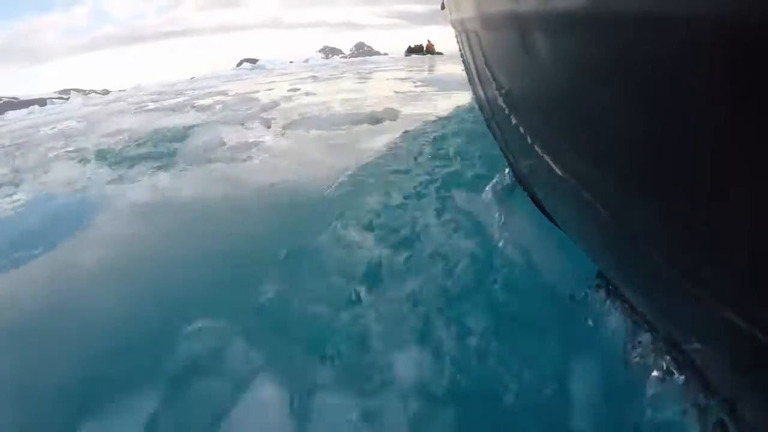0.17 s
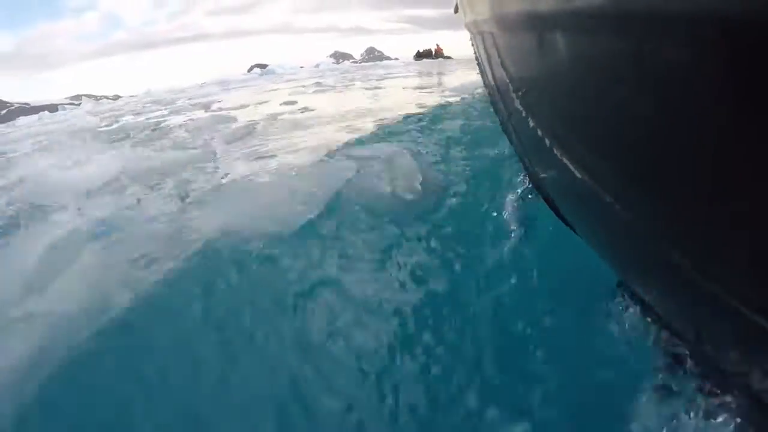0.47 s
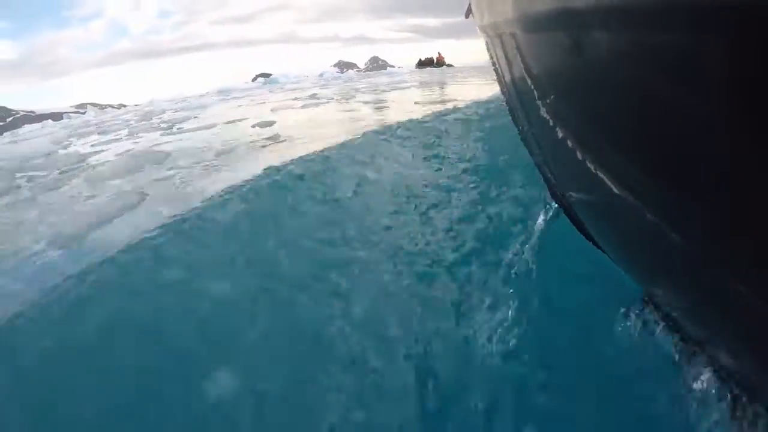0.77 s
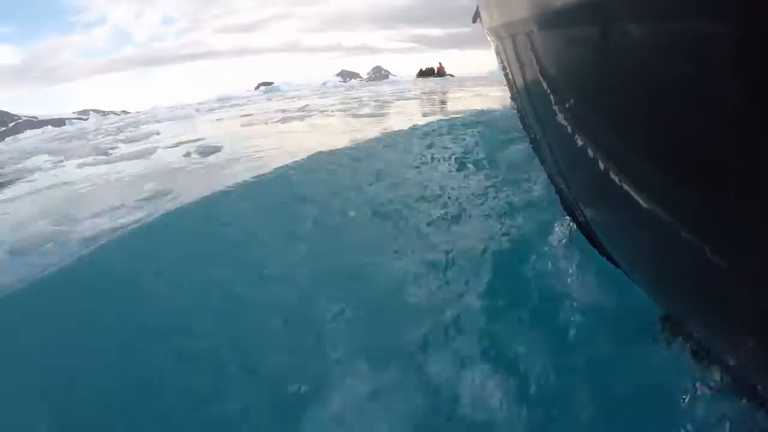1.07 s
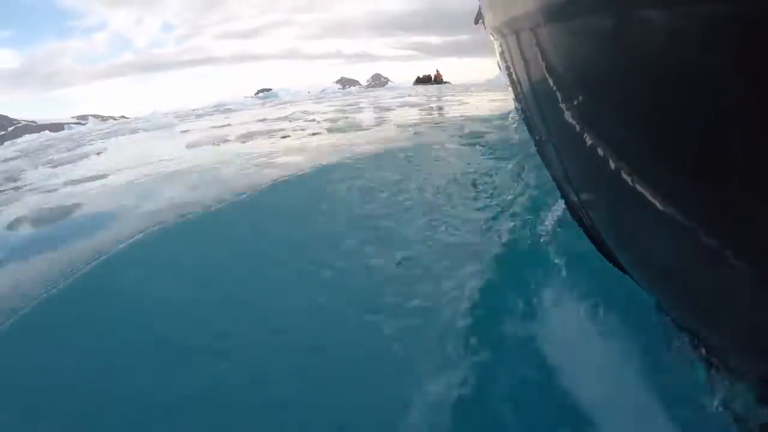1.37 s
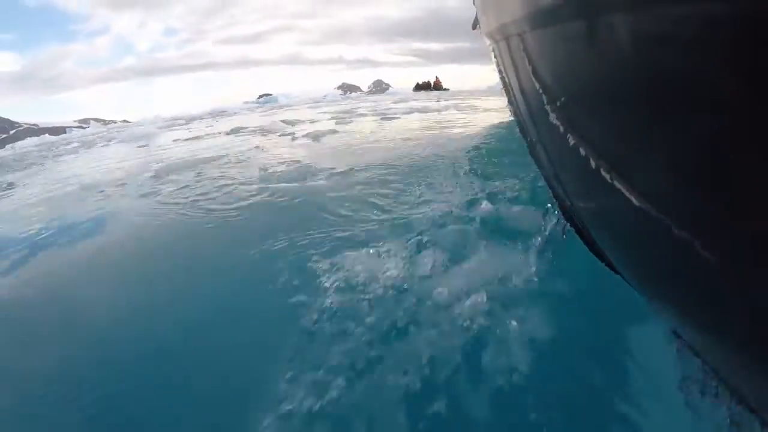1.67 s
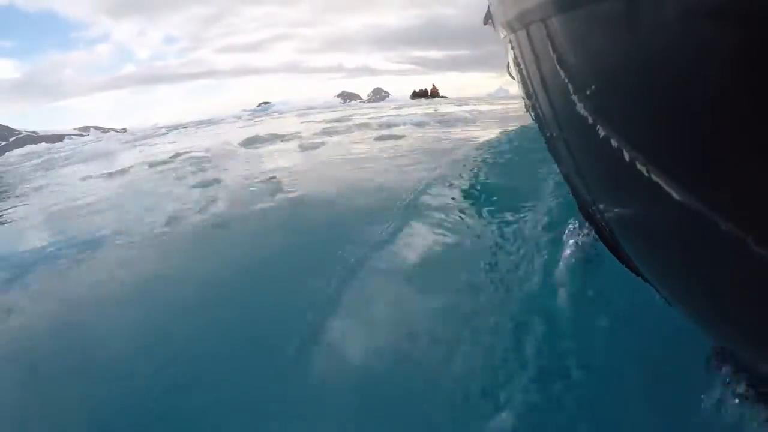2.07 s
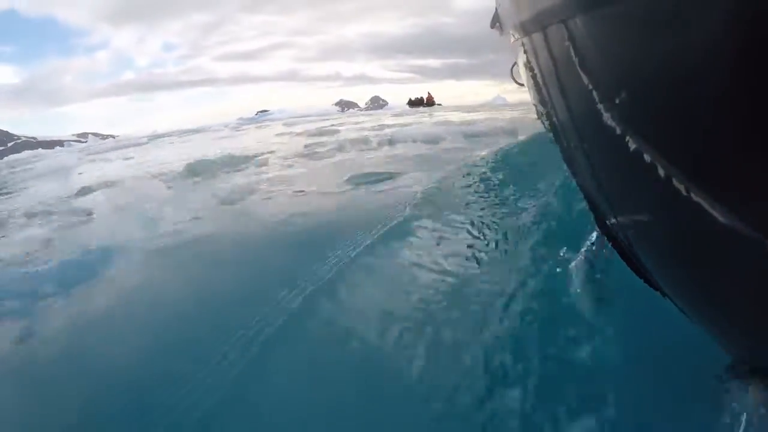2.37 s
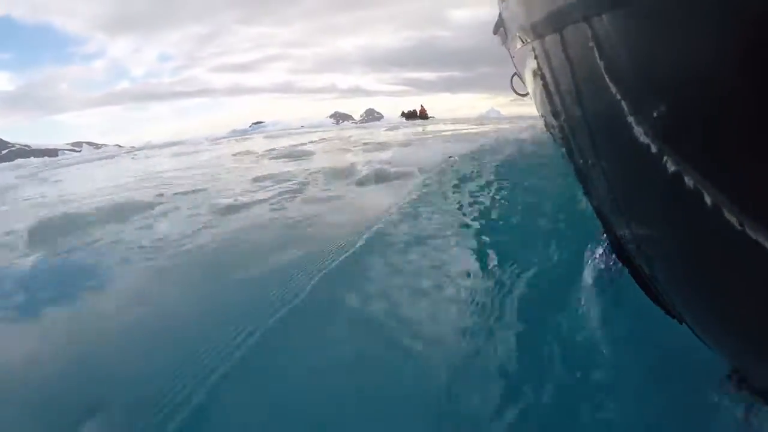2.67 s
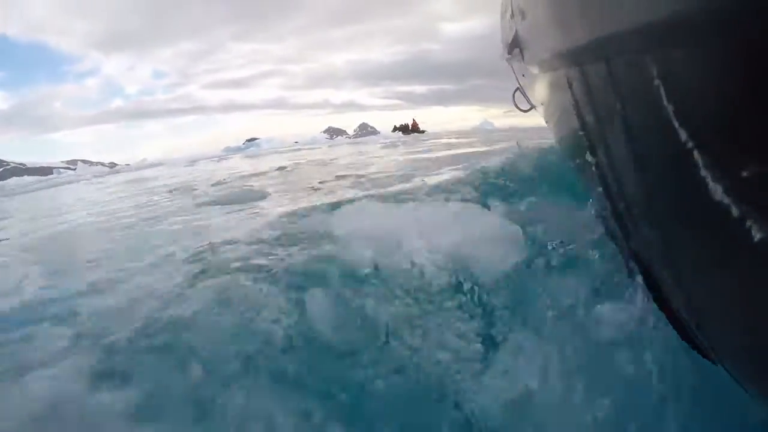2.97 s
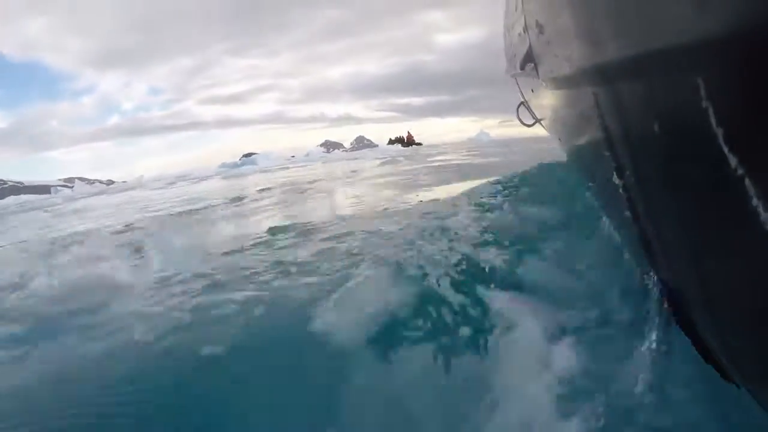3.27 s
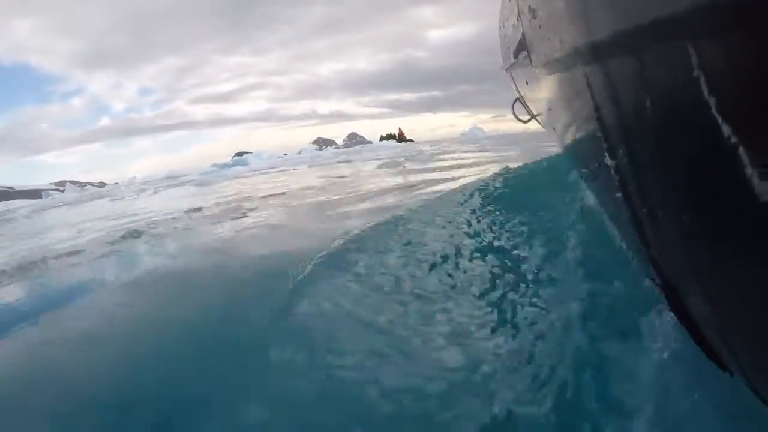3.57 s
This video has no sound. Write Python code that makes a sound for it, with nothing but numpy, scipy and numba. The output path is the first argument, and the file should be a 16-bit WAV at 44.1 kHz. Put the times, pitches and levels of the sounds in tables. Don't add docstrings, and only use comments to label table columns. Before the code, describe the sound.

Water gurgles and bubbles along a moving boat hull, with low rumble and faint icy clicks

```python
import sys
import numpy as np
from scipy import signal
from scipy.fft import rfft, irfft, next_fast_len
from scipy.io import wavfile
from numba import njit

SR = 44100
rng = np.random.default_rng(int(sys.argv[2]) if len(sys.argv) > 2 else 0)


def dump(signal):
    limited = np.clip(np.atleast_2d(signal).T, -1, 1)
    pcm = np.round(limited * 32767).astype(np.int16)
    wavfile.write(sys.argv[1], SR, pcm)


def voltage_ratio(decibels):
    exponent = np.asarray(decibels, float) / 20
    return 10 ** exponent


N = 164493


def level_db(rows):
    t_s, db = np.transpose(rows)
    return np.interp(np.arange(N) / SR, t_s, db)


def rms_one(x):
    return x / np.sqrt(np.mean(x ** 2) + 1e-20)


def colour(x, points):
    f_hz, db = np.transpose(points)
    size = next_fast_len(N)
    log_f = np.log(np.arange(1, size // 2 + 2) * SR / size)
    gain = voltage_ratio(np.interp(log_f, np.log(f_hz), db, -120, -120))
    return rms_one(irfft(rfft(x, size) * gain, size)[:N])


def drift(rate_hz):
    hop, settle = 40, 2000
    pole = np.exp(-2 * np.pi * rate_hz * hop / SR)
    white = rng.standard_normal(N // hop + 2 + settle)
    slow = signal.lfilter([1], [1, -2 * pole, pole * pole], white)[settle:]
    return np.interp(np.arange(N) / hop, np.arange(len(slow)), rms_one(slow))


@njit
def add_bubbles(out, start, gain, f_hz, cycles, rise, swell, sr):
    for k in range(len(start)):
        tau = cycles[k] / f_hz[k] * sr
        phase, step = 0., 2 * np.pi * f_hz[k] / sr
        for i in range(min(int(tau * (6 + swell)), len(out) - start[k])):
            u = i / tau
            phase += min(step * (1 + rise[k] * u), 3.)
            envelope = (1 - np.exp(-u / swell)) ** 2 * np.exp(-u)
            out[start[k] + i] += gain[k] * np.sin(phase) * envelope


def froth(count, low_hz, high_hz, cycles, rise, spread_db, clump_db):
    when, size, loud, ring, climb = rng.random((count, 5)).T
    busy = np.cumsum(voltage_ratio(clump_db))
    start = np.searchsorted(busy / busy[-1], when)
    f_hz = low_hz * (high_hz / low_hz) ** size
    gain = f_hz * voltage_ratio(spread_db * np.minimum(-np.log(loud), 3.2))
    ringing = cycles * (0.27 + 1.64 * ring ** 2)
    out = np.zeros(N)
    add_bubbles(out, start, gain, f_hz, ringing, rise * 3 * climb ** 3, 0.3, SR)
    return rms_one(out)


def wash(patchy_db, rate_hz):
    out, together = 0, drift(rate_hz)
    edges_hz = 15 * 2 ** np.arange(0, 10.1, 0.5)
    white = rng.standard_normal((2, N))
    for k, band_hz in enumerate(zip(edges_hz, edges_hz[1:])):
        sos = signal.butter(2, band_hz, "band", fs=SR, output="sos")
        band = signal.sosfilt(sos, white[k % 2])
        out = out + band * voltage_ratio(patchy_db * (0.18 * together + drift(rate_hz)))
    return rms_one(out)


def lone(rows, cycles, rise, swell, trim_db):
    t_s, db, f_hz = np.transpose(rows)
    ringing = cycles * (f_hz / f_hz.mean()) ** 1.1
    out = np.zeros(N)
    add_bubbles(out, (t_s * SR).astype(np.int64), voltage_ratio(db + trim_db), f_hz, ringing, rise + 0 * t_s, swell, SR)
    return out


# [t/s, level/dB]
WAVE_LEVEL = [(0.0, -27), (0.36, -28), (0.58, -31.5), (0.83, -29.5), (1.17, -28.5), (1.5, -29), (1.67, -22),
              (1.82, -31.5), (1.95, -27), (2.14, -28.5), (2.68, -30), (3.02, -26.5), (3.32, -28.5),
              (3.61, -26.5), (3.73, -22.5)]
# [f/Hz, density/dB]
WAVE_COLOUR = [(100, 3), (170, 2.5), (300, -2.5), (520, -11), (720, -11), (1300, -16), (1800, -24),
               (3000, -39)]


def bow_wave(churn, rise_db):
    clump_db = 2.5 * churn + 1.5 * drift(25.01)
    crowd = froth(count=5000, low_hz=109.07, high_hz=2797, cycles=3.24, rise=0.0827,
                  spread_db=4.0, clump_db=clump_db)
    bed = voltage_ratio(-5.0 + 0.6 * churn) * wash(patchy_db=1.0, rate_hz=6.8)
    return voltage_ratio(level_db(WAVE_LEVEL) + 3.5 + rise_db) * colour(crowd + bed, WAVE_COLOUR)


# [t/s, level/dB]
SPRAY_LEVEL = [(0.0, -43), (0.36, -41), (0.92, -43.5), (1.07, -42.5), (1.78, -42), (1.9, -44.5),
               (2.25, -45), (3.2, -39.5), (3.73, -41)]
# [f/Hz, density/dB]
SPRAY_COLOUR = [(900, 7), (1700, 9), (2500, -3.5), (4400, -5), (5150, -17), (7000, -17), (9000, -20),
                (14800, -50.5)]


def spray(churn, rise_db):
    clump_db = 2.2 * churn + 2.5 * drift(90.0)
    crowd = froth(count=20000, low_hz=891.0, high_hz=11220, cycles=4.8, rise=0.023,
                  spread_db=5.0, clump_db=clump_db)
    bed = voltage_ratio(-1.6 + 1.1 * churn) * wash(patchy_db=0.8, rate_hz=16.0)
    return voltage_ratio(level_db(SPRAY_LEVEL) + 6.0 + rise_db) * colour(crowd + bed, SPRAY_COLOUR)


# [centre t/s, half-length/s, bow wave rise/dB, spray rise/dB]
SPLASHES = [(0.033, 0.0056, 2.5, 1.5), (0.355, 0.049, 7, 1.5), (0.579, 0.0096, 7.5, 1.5),
            (0.747, 0.0053, -3, 8.5), (1.054, 0.0089, 9, -2), (1.556, 0.016, 1.5, 5.5),
            (1.645, 0.0048, 6.5, -8), (1.71, 0.01, 2.5, 5.5), (1.794, 0.055, 11, -1), (1.909, 0.01, 6, 6),
            (2.596, 0.0034, -13, -2), (0.505, 0.038, 6, -1.5), (3.274, 0.029, -1, -3),
            (3.017, 0.023, 4, 3.5), (3.431, 0.026, 6, 3.5), (3.505, 0.036, 7, 1.5)]


def splashes():
    t_s, half_s, *rise_db = np.transpose(SPLASHES)
    away = (np.arange(N) / SR - t_s[:, None]) / half_s[:, None]
    return np.array(rise_db) @ np.exp(-away ** 2)


# [t/s, peak level/dB, f/Hz]
GULPS = [(0.075, -9, 135), (0.155, -6, 130), (0.33, -17, 258), (0.692, -9, 148), (1.036, -7, 184),
         (1.092, -11, 205), (1.326, -7.5, 165), (1.437, -12.5, 155), (1.646, -16, 270), (1.791, -0.5, 167),
         (2.005, -3, 231), (2.63, -2, 140), (2.739, -10, 179), (2.831, -1, 155), (2.879, -5, 191.6),
         (2.968, -4.5, 285), (3.033, -8, 212), (3.118, -6.5, 169.2), (3.188, -7, 198), (3.421, -11.5, 362),
         (3.509, -1.5, 152.5), (3.662, -6, 238)]


def gulps():
    return lone(GULPS, cycles=0.8, rise=0.072, swell=0.48, trim_db=5.5)


# [t/s, peak level/dB, f/Hz]
PLOPS = [(0.277, -15.5, 890), (0.338, -12, 524), (0.369, -10, 482), (0.464, -10, 644), (0.499, -8.5, 1010),
         (1.042, -6, 498), (1.055, -12, 874), (1.127, -11, 783), (1.2025, -3, 790), (1.335, -7.5, 630),
         (1.559, -7, 800), (1.575, -5.5, 1174), (1.641, 3.5, 930), (1.648, -0.5, 675), (1.745, -10, 1160),
         (1.799, -5, 1340), (1.782, -13, 720), (1.993, -11, 1190), (2.185, -25.5, 800), (2.212, -7, 470),
         (3.028, -6, 676), (3.085, -8, 1080), (3.187, -9, 910), (2.702, -13.5, 806), (3.257, -9, 993),
         (3.382, -2.5, 750), (3.468, -5.5, 757), (3.493, -7, 1055), (3.511, -5, 800), (3.421, -7, 663),
         (3.447, -5, 530), (3.479, -7.5, 836), (3.522, -9, 1170), (3.532, -6, 1130), (3.572, -11, 1063),
         (3.59, -7, 1220), (3.694, -19, 906)]


def plops():
    return lone(PLOPS, cycles=1.18, rise=0.025, swell=0.55, trim_db=4.5)


# [t/s, peak level/dB, f/Hz]
PLINKS = [(0.043, -16.5, 1330), (0.077, -16.5, 1320), (0.277, -18.5, 1500), (0.352, -15.5, 1150),
          (0.602, -19, 1290), (3.27, -13, 1000), (3.305, -17.5, 1040), (0.2117, -12, 1310),
          (0.384, -18.5, 1470), (0.6368, -25, 2030), (0.6942, -21, 1820), (0.7358, -16.5, 2130),
          (0.7473, -17.5, 1930), (0.9752, -15.5, 1690), (1.261, -22, 1550), (1.3227, -20, 1664),
          (1.4706, -23, 1530), (1.5478, -19.5, 1895), (1.89, -20.5, 1430), (2.4506, -23, 1630),
          (2.815, -18.5, 1664), (2.8829, -17.5, 1690), (2.974, -14, 1730), (2.992, -18, 1530),
          (3.254, -19, 1490), (3.531, -20, 1640)]


def plinks():
    return lone(PLINKS, cycles=5.1, rise=0.038, swell=0.33, trim_db=4.0)


# [t/s, peak level/dB, start f/Hz, ringing/cycles]
GLIDES = [
    (1.631, -21, 146, 1.8),
    (1.632, -11.5, 572, 3.4),
    (2.1, -22.5, 2200, 8.8),
    (2.5, -27, 2780, 5.),
    (3.658, -12.5, 1197, 4.3),
    (0.941, -26, 1240, 2.8),
    (1.736, -24.5, 1560, 14),
]


def glides():
    t_s, db, f_hz, cycles = np.transpose(GLIDES)
    out = np.zeros(N)
    add_bubbles(out, (t_s * SR).astype(np.int64), voltage_ratio(db + 11.5), f_hz, cycles, 0.38 + 0 * t_s, 0.8, SR)
    return signal.sosfilt(signal.butter(3, 1750, fs=SR, output="sos"), out + 1e-18)


# [t/s, peak level/dB, f/Hz]
TICKS = [(0.0393, -21, 2660), (0.3701, -30, 2750), (0.716, -24, 2640), (0.7464, -22, 2750),
         (0.8764, -32, 3870), (1.054, -27, 3140), (1.0969, -29.5, 4400), (1.1373, -32, 3200),
         (1.261, -24, 2570), (1.3119, -28, 4000), (1.4142, -26.5, 3720), (1.5614, -22.5, 3790),
         (1.5783, -26, 2560), (1.701, -25, 4070), (1.7449, -26, 2760), (1.7983, -44, 2630),
         (1.843, -28.5, 2740), (1.9117, -28, 2450), (2.0083, -31, 3320), (2.0358, -35, 2580),
         (2.15, -29, 2690), (2.4598, -31, 2840), (2.507, -27, 3970), (2.554, -37, 2500),
         (2.9692, -30, 3420), (3.0121, -29, 3140), (3.07, -26.5, 3170), (3.1258, -22.5, 2600),
         (3.1694, -24, 3270), (3.2041, -30, 2570), (3.2251, -29, 3860), (3.255, -27, 2920),
         (3.383, -34, 4150), (3.6393, -24.5, 2550)]


def ticks():
    return lone(TICKS, cycles=3.9, rise=0.011, swell=0.34, trim_db=5.0)


# [t/s, peak level/dB, f/Hz]
DROPS = [(0.171, -37, 5990), (0.208, -36, 8750), (0.5701, -44, 5950), (0.631, -37, 6460),
         (0.6679, -33, 6100), (0.7327, -39, 6750), (0.7472, -29, 6480), (0.8475, -32, 6700),
         (0.9747, -37, 6840), (1.072, -31, 5250), (1.3593, -35, 5880), (1.5209, -35, 6580),
         (1.8492, -38, 7000), (1.9135, -42, 5800), (2.1066, -32, 6730), (2.4044, -39, 6420),
         (2.5406, -42, 5700), (2.597, -35, 8420), (2.605, -29, 6800), (2.7541, -30.5, 8450),
         (2.9407, -31, 6100), (2.9736, -42, 5250), (3.0061, -40, 5730), (3.019, -35, 7350),
         (3.1896, -46, 6960), (3.3787, -35, 5880), (3.4131, -29, 6400), (3.5665, -33, 6960)]


def drops():
    return lone(DROPS, cycles=10.3, rise=0.011, swell=0.53, trim_db=1.5)


# [t/s, peak level/dB]
CRACKS = [
    (0.572, -18.5),
    (0.748, -13),
    (0.787, -20.5),
    (1.072, -25),
    (1.239, -20.5),
    (1.914, -17),
    (2.604, -21.5),
    (2.975, -22.5),
    (3.384, -18.5),
]


def cracks():
    t_s, db = np.transpose(CRACKS)
    clicks = np.zeros(N)
    clicks[(t_s * SR).astype(int)] = voltage_ratio(db)
    shaped = colour(clicks, SPRAY_COLOUR)
    return shaped * voltage_ratio(db.max()) / np.abs(shaped).max()


# [t/s, peak level/dB, f/Hz]
THUMPS = [
    (.014, -5, 104),
    (.203, -14, 88.3),
    (.493, -9, 82.5),
    (1.03, -11, 69),
    (1.32, -10, 75),
    (1.57, -11, 56),
    (1.67, -3.5, 51.3),
    (1.9, -21, 44),
    (2.04, -9.5, 51.4),
    (2.85, -10, 100),
]


def thumps():
    return lone(THUMPS, cycles=0.93, rise=0.038, swell=0.33, trim_db=3.0)


# [t/s, level/dB]
RUMBLE_LEVEL = [(0, -15), (.2, -18.5), (.4, -16.5), (.6, -22), (.9, -17.5), (1.1, -20.5), (1.3, -23.5),
                (1.45, -19.5), (1.6, -26), (1.75, -20.5), (2.0, -19), (2.2, -18.5), (2.5, -22.5),
                (2.8, -23.5), (3.1, -20), (3.3, -25.5), (3.55, -20.5), (3.73, -21.5)]
# [f/Hz, density/dB]
RUMBLE_COLOUR = [(15, -22), (30, -4.5), (50, 0.5), (80, 1.5), (130, 0), (200, -13), (350, -28),
                 (700, -54.5)]


def rumble():
    return voltage_ratio(level_db(RUMBLE_LEVEL)) * colour(wash(patchy_db=0.7, rate_hz=1.3), RUMBLE_COLOUR)


# [f/Hz, width/Hz, boost/dB]
HOUSING = [(538, 140, 1), (677, 91, 2.5), (1720, 300, 0.5), (4780, 360, -0.5), (5250, 600, -3)]


def housing(x):
    for f_hz, width_hz, db in HOUSING:
        b, a = signal.iirpeak(f_hz, f_hz / width_hz, fs=SR)
        x = x + (voltage_ratio(db) - 1) * signal.lfilter(b, a, x)
    return x


def scene():
    churn = drift(45.0)
    wave_db, spray_db = splashes()
    froths = bow_wave(churn, wave_db) + spray(churn, spray_db)
    bubbles = gulps() + plops() + plinks() + glides()
    hits = ticks() + drops() + cracks() + thumps()
    return (froths + bubbles + hits + rumble())[None]


def top_cut(x):
    return signal.sosfilt(signal.butter(12, 14900, fs=SR, output="sos"), x)


def record(dry):
    mix = 1.211 * np.tanh(housing(dry) / 1.169)
    return top_cut(mix)


dry = scene()
out = record(dry)
dump(out)
```